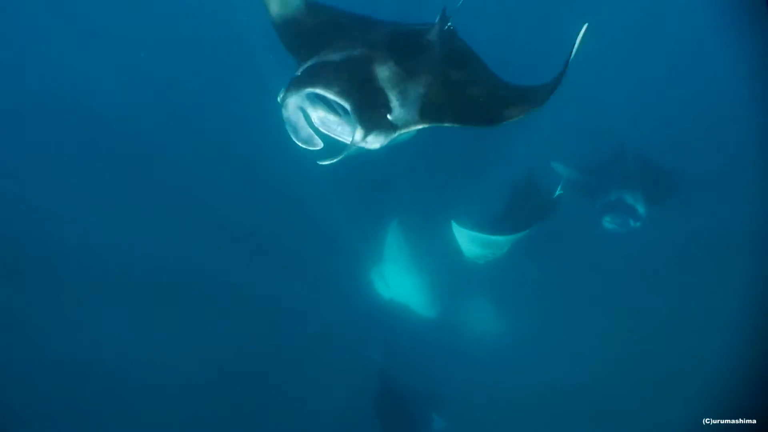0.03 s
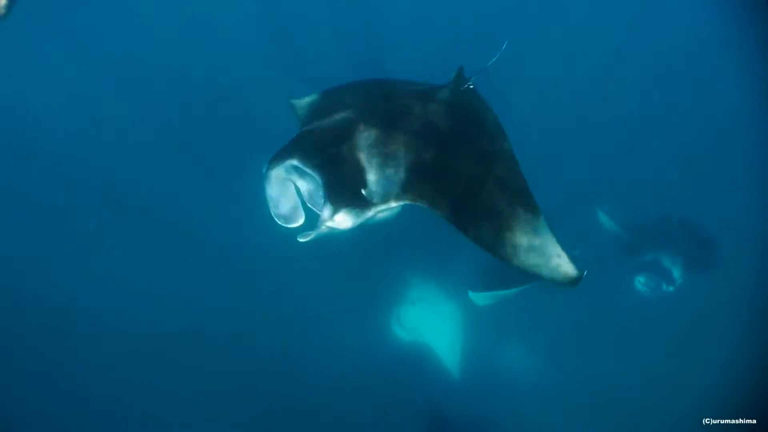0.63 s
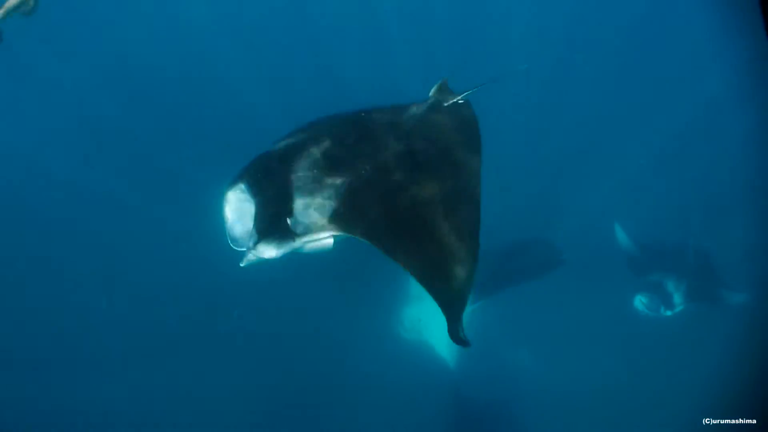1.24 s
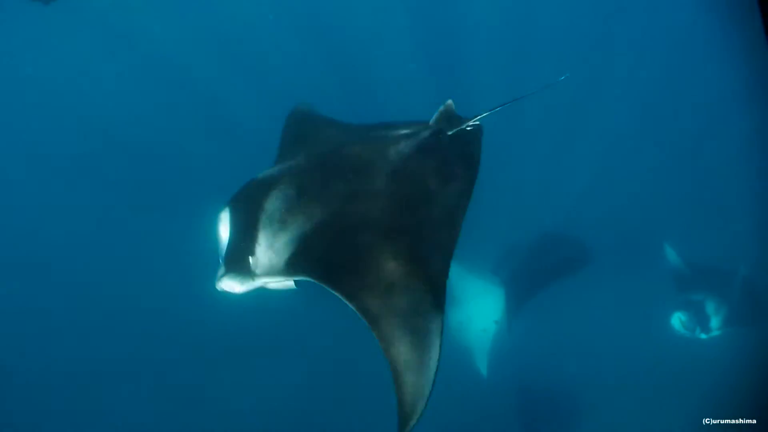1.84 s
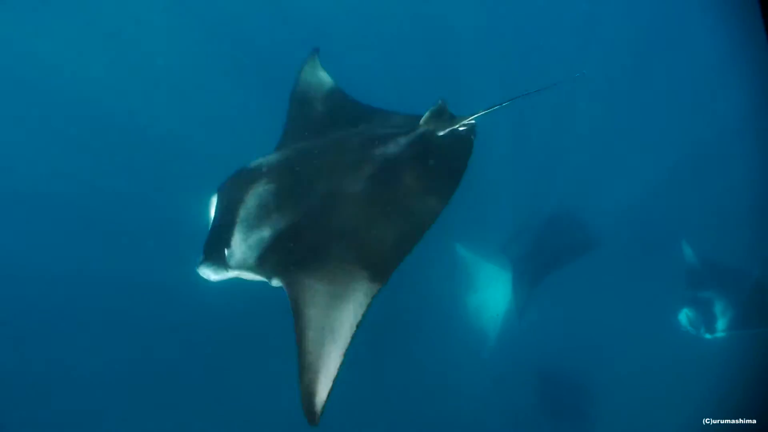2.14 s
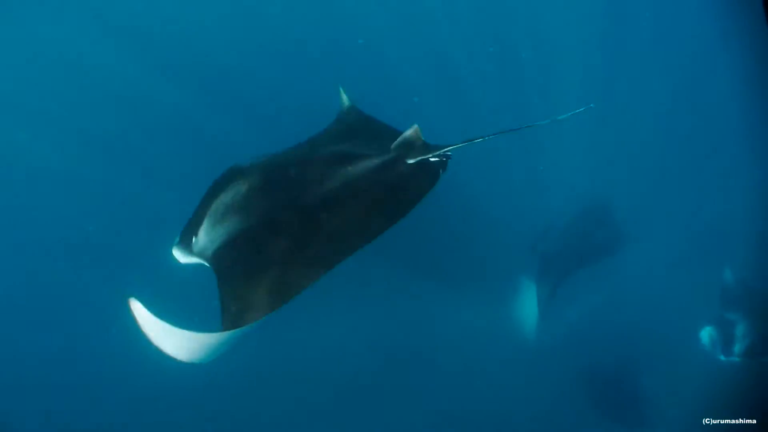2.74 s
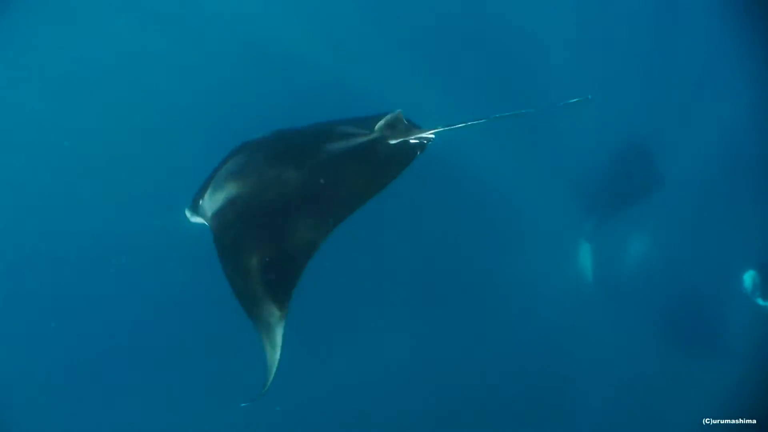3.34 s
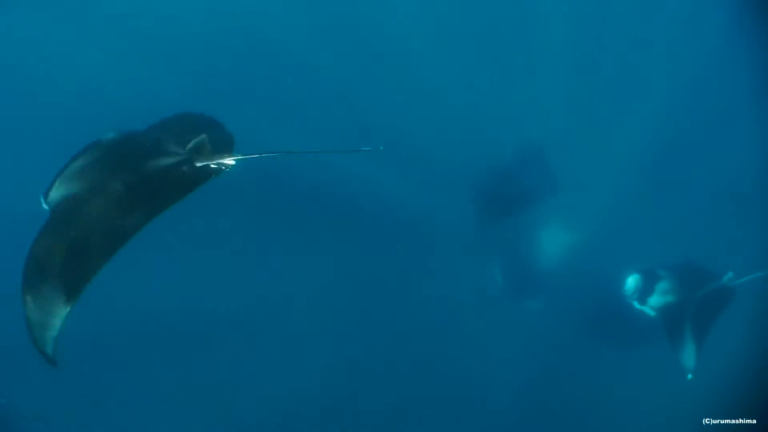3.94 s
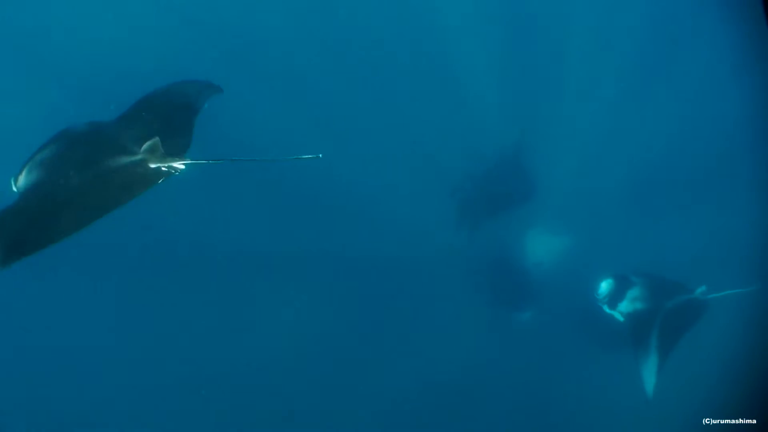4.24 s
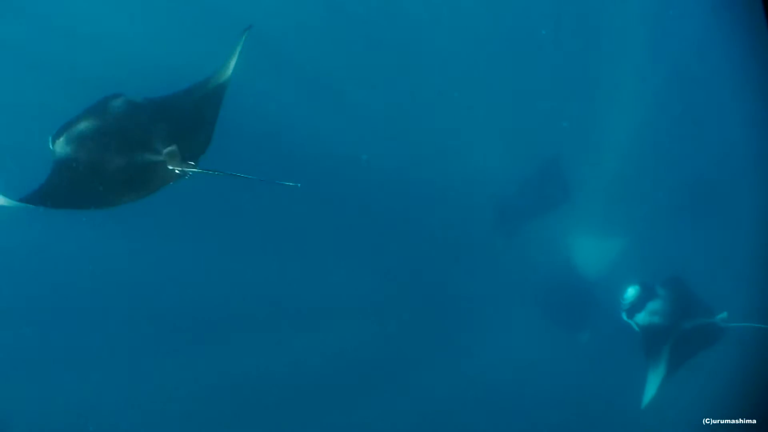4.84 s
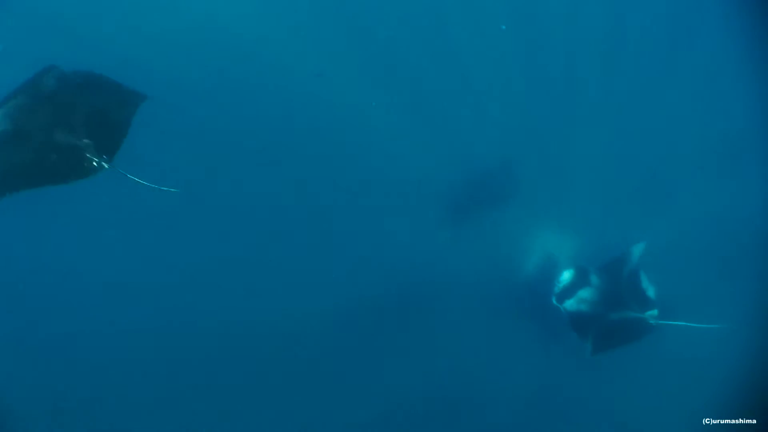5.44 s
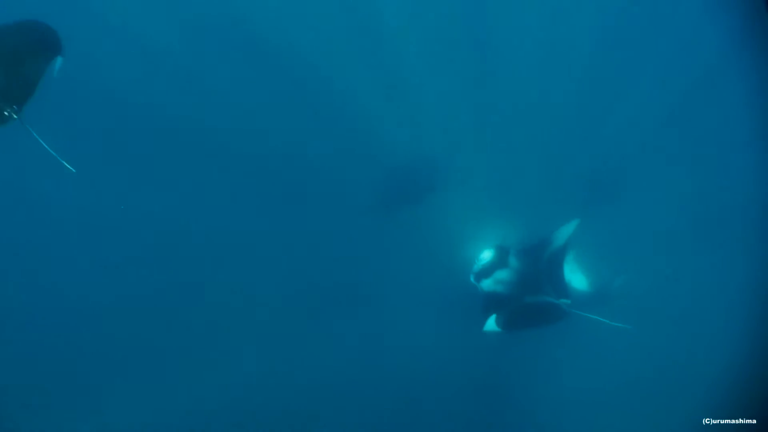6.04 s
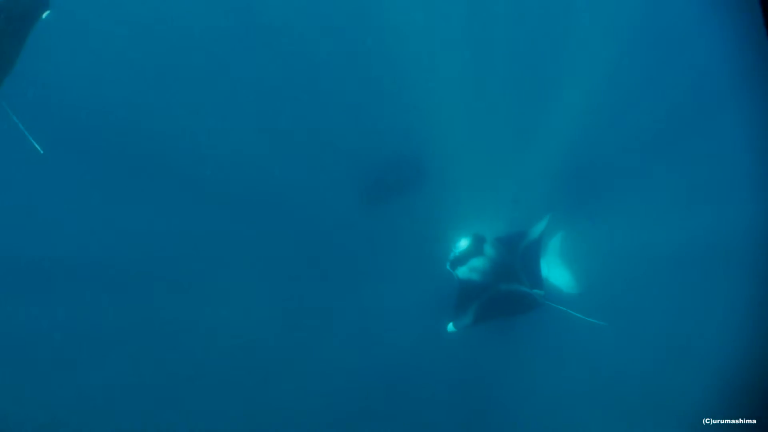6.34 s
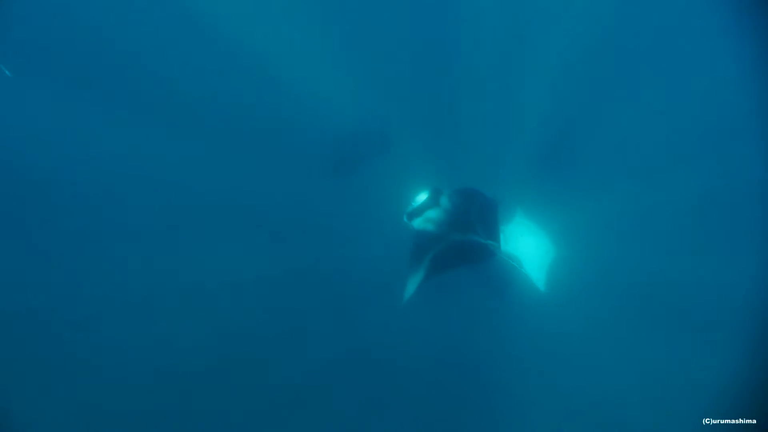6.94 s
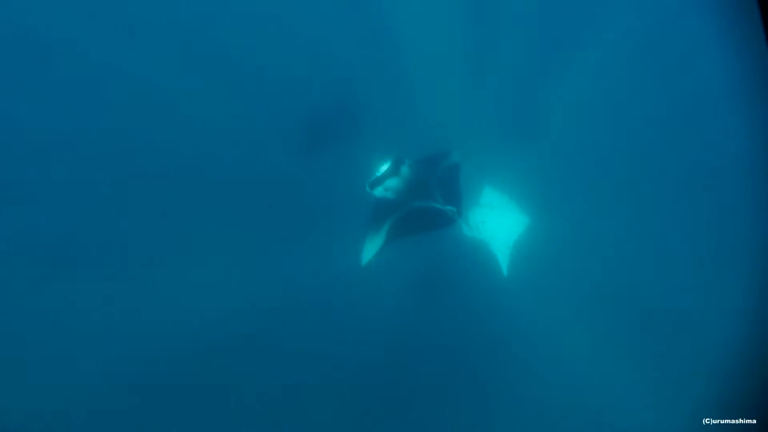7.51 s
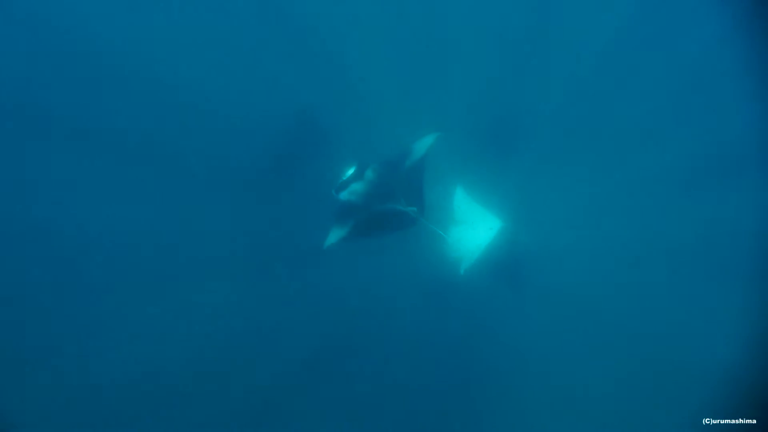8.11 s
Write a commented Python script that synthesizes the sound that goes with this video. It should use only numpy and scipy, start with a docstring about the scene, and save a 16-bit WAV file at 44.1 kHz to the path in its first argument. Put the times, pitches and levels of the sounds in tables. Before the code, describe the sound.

For about eight seconds, a microphone inside an underwater camera housing hears a quiet, dull wash of water, sprinkled with tiny snaps and pops. Very close, a small steadying motor works in short, irregular bursts throughout, making the housing hum on a few middle tones, with brief squeaks and light clacks that crowd together between 5 and 7 seconds. A focus motor adds a soft whine and rapid ticking from the start to 1.3 seconds, from 2.6 to 3.7, and from 4.5 to 6.9. Hands bump the housing with occasional soft rumbles. A rubber seal squeaks faintly near 2.7 seconds and groans briefly near 3.9. At 4 seconds comes one hard, sharp knock with a quick rebound, by far the loudest sound. Much weaker taps follow near 5.7 and 6.9. A very faint, high electronic whine persists underneath.

```python
"""A diving camera adrift

A camera in a diving housing drifts in a dull wash of water, pricked by tiny snaps. A rubber seal
creaks, hands bump the housing softly, and something knocks hard on it once. The electronics whine
faintly, and three times the focus motor runs, whining and ticking once a frame. The stabiliser
servo, a small steadying motor, works in fits and starts and makes the housing hum and clack."""
import sys
import numpy as np
from scipy import signal
from scipy.fft import rfft, irfft
from scipy.io import wavfile
from scipy.ndimage import uniform_filter1d

SR = 44100
rng = np.random.default_rng(int(sys.argv[2]) if len(sys.argv) > 2 else 0)


def store_wav(level_fs):
    """Save 16-bit WAV to argv[1]."""
    pcm = np.round(np.clip(np.atleast_2d(level_fs), -1, 1) * 32767)
    wavfile.write(sys.argv[1], SR, pcm.T.astype(np.int16))


N = 360297
T = np.arange(N) / SR
FREQS = np.arange(N // 2 + 1) * SR / N


def undb(db):
    """Turn decibels into a gain."""
    return 10 ** (np.asarray(db) / 20)


def unit(x):
    """Scale to an average strength (rms) of 1."""
    return x / np.sqrt(np.mean(x ** 2))


def even(x, size):
    """Hold a noise's strength steady over spans of `size` samples, keeping its fine grain."""
    return x / np.sqrt(uniform_filter1d(np.mean(x ** 2, axis=0), size) + 1e-9)


def over_time(rows):
    """Join (time_s, value) rows with straight lines."""
    return np.interp(T, *np.transpose(rows))


def over_pitch(rows):
    """Spread each column of a (pitch_hz, ...) table over all frequencies."""
    hz, *columns = np.transpose(rows)
    return [np.interp(np.log(FREQS + 1), np.log(hz), column) for column in columns]


def wander(rate_hz):
    """A smooth random drift, about 1 in size."""
    hold = max(int(SR / rate_hz), 1)
    steps = np.repeat(rng.standard_normal(N // hold + 1), hold)
    return unit(uniform_filter1d(steps, hold)[:N])


def sides(difference):
    """Split between left and right: pan_db makes the left louder, lead_rad makes it earlier."""
    return np.array([[.5], [-.5]]) * difference


def add(out, start_s, sound):
    """Mix a short sound in at start_s."""
    start = int(start_s * SR)
    out[:, start:start + sound.shape[-1]] += sound[..., :N - start]


# How the two microphones hear the housing: pitch_hz, likeness (0 to 1), lead_rad, pan_db
MICROPHONE_PAIR = [(60, 0.7, 0.6, 0.5), (250, 0.97, 0.54, 1), (377, 0.82, 0.92, 0.5),
                   (698, 0.92, 0.49, -0.3), (924, 0.56, 1.99, 6), (1109, 0.02, -1.7, 1.5),
                   (1113, 0.71, -0.5, 10), (1200, 0.95, -0.8, 1), (1314, 1, -1.17, -2),
                   (1665, 0.67, 3.5, 0.5), (2000, 0.83, 3.5, 1), (3040, 0.71, 2, -0.5), (5100, 0.59, 3, -1),
                   (7050, 0.38, 3, -0.3)]

def shaking(grain=1):
    """Stereo spectrum of random shaking: the walls move both sides together low down, opposed higher up."""
    likeness, lead_rad, pan_db = over_pitch(MICROPHONE_PAIR)
    shared, left, right = rfft(grain * rng.standard_normal((3, N)))
    pair = np.sqrt(likeness) * shared + np.sqrt(1 - likeness) * np.array([left, right])
    return pair * undb(sides(pan_db)) * np.exp(1j * sides(lead_rad))


def shaped_noise(spectrum, gain):
    """Colour a spectrum and turn it into sound of strength 1."""
    return unit(irfft(spectrum * gain, N))


def resonate(spectrum, modes, skirt):
    """Shaking rings a part at its own pitches (modes); a higher skirt leaves less between them."""
    power = sum(undb(db) ** 2 / (1 + (2 * (FREQS - hz) / width_hz) ** 2 / skirt) ** skirt
                for hz, width_hz, db in modes)
    return shaped_noise(spectrum, np.sqrt(power))


def squeals(rows, gain_db, pan_db, lead_rad, sag, waver_db):
    """Surfaces stick and slip: each tone starts fast, wavers, sinks a little in pitch and dies away."""
    out = np.zeros((2, N))
    waver = undb(waver_db * wander(110))
    phases = rng.uniform(0, 2 * np.pi, len(rows))
    for (start_s, db, hz, length_s), phase in zip(rows, phases):
        t = np.arange(int(length_s * SR)) / SR
        swell = np.sin(np.pi * np.sqrt(t / length_s))
        cycles = np.cumsum(hz * (1 + sag * (.5 - t / length_s))) / SR
        tone = np.sin(2 * np.pi * cycles + phase + sides(lead_rad))
        add(out, start_s, undb(db + gain_db + sides(pan_db)) * swell * tone)
    return out * waver


# The tone colour of the water: pitch_hz, relative_db
WATER_COLOUR = [(25, -50), (60, -18.5), (100, -10), (150, -4.5), (400, -1), (700, 3), (1350, -3.5),
                (1700, -1.5), (2800, -5), (3500, -9.5), (4800, -10), (6500, -14.5), (10000, -20),
                (15000, -30.5)]
# Its slow rise and fall: time_s, relative_db
WATER_SWELL = [(0, -69), (2.4, -71.5), (3.55, -70.5), (4.2, -68), (5.05, -69), (6.37, -71), (6.8, -70),
               (7.35, -71.5), (8.17, -72)]

def water_wash(gain_db=15, recording_flutter_db=1.3):
    noise = shaped_noise(shaking(), undb(over_pitch(WATER_COLOUR)[0]))
    return noise * undb(over_time(WATER_SWELL) + gain_db + recording_flutter_db * wander(25))


# The high tones of the electronics: pitch_hz, level_db, pan_db
ELECTRONICS_TONES = [(7867, -96.5, -5), (15734, -101, -3)]

def whine(tones, waver_db, waver_hz):
    """Electronics or a motor sing thin, steady tones that waver in strength."""
    out = np.zeros((2, N))
    for hz, db, pan_db in tones:
        strength = np.sqrt(2) * undb(db + sides(pan_db) + waver_db * wander(waver_hz))
        phase = 2 * np.pi * hz * T + 0.47 * wander(5.7)
        out += strength * np.sin(phase + sides(0.25))
    return out


# Nearby snaps and pops: start_s, peak_db, pitch_hz, half_width (of the band, as a log ratio)
NEAR_SNAPS = [(0.357, -44, 5500, 0.35), (0.527, -41, 5000, 0.44), (0.812, -45, 3600, .33),
              (1.333, -33.5, 2900, 0.26), (1.432, -49, 4070, 0.28), (1.645, -53, 2690, 0.07),
              (1.961, -44, 4180, 0.33), (2.541, -43, 3370, .25), (2.922, -50, 2060, 0.048),
              (3.078, -46, 2020, 0.081), (3.313, -45, 3100, 0.71), (4.027, -50, 5100, .1),
              (4.129, -50, 2380, 0.073), (4.175, -38.5, 4600, 0.11), (4.224, -45, 7650, .06),
              (4.242, -47, 3160, 0.049), (4.267, -50, 2480, .2), (4.438, -41, 3200, 0.6),
              (4.642, -42.5, 3520, 0.38), (5.449, -45, 2740, 0.21), (5.47, -39, 3300, 0.75),
              (6.334, -45, 3000, 0.49), (6.859, -37.5, 3300, 0.43), (6.972, -40, 3010, 0.29)]

def water_snaps(far_count=80, far_db=-60, spread_db=8, far_width=0.23, decay_s=0.0028):
    """Tiny cracks, as of shrimp, and narrower pops, as of bubbles: near ones over many far ones."""
    far_snaps = [(when * (N - 1) / SR, far_db + spread_db * size ** 2, 2800 + 5500 * pitch, far_width)
                 for when, size, pitch in rng.random((far_count, 3))]
    t = np.arange(SR // 40) / SR
    out = np.zeros((2, N))
    for start_s, db, hz, width in NEAR_SNAPS + far_snaps:
        band = signal.butter(2, [hz * np.exp(-width), hz * np.exp(width)], "band", fs=SR)
        crack = signal.lfilter(*band, rng.standard_normal((2, len(t))) * np.exp(-t / decay_s))
        add(out, start_s, undb(db) * crack / np.abs(crack).max())
    return out


# Creaks and low groans of the seal: start_s, relative_db, pitch_hz, length_s
SEAL_CREAKS = [(1.147, -42, 1820, 0.013), (1.898, -48.5, 1520, 0.012), (2.702, -42, 2180, 0.0069),
               (2.711, -38, 2000, 0.018), (2.732, -45, 2110, 0.01), (2.734, -43, 2670, 0.01),
               (2.742, -39, 2900, 0.014), (2.744, -46, 3300, 0.0055), (3.852, -45, 333, 0.035),
               (3.855, -36.5, 534, 0.011), (3.88, -40, 430, 0.02)]

def seal_creaks():
    """The rubber seal grips and lets go unevenly, which roughens its squeaks."""
    squeaks = squeals(SEAL_CREAKS, gain_db=-4, pan_db=1, lead_rad=1.1, sag=0.02, waver_db=-2)
    grip = .5 + .8 * wander(450)
    return squeaks * grip


# Notes of the struck housing: pitch_hz, relative_db, ring_s (time to fade 60 dB), pan_db, lead_rad
HOUSING_MODES = [(173, -26.5, 0.072, 0, 0.7), (228, -31.5, 0.059, 2, 0.6), (298, -19, 0.056, 0, 0.1),
                 (392, -23, 0.023, -6, 0.5), (506, -19, 0.029, 1, 0.9), (636, -36, 0.081, 1, 1),
                 (846, -27, 0.05, -6, 4), (1025, -27, 0.03, -14, 3.5), (1324, -14, 0.037, -3, 1),
                 (1570, -35, 0.077, -0.5, -1), (1740, -18, 0.014, 7, 4), (1936, -12, 0.019, 1, 4),
                 (2200, -19.5, 0.016, -9, 4), (2360, -21.5, 0.032, -3, 2), (2590, -23.5, 0.016, -4, 0.5),
                 (2840, -21, 0.019, -4, 1.7), (3350, -27, 0.012, -8, 2), (3760, -19.5, 0.012, 1, 1.7),
                 (4030, -23, 0.016, 6.5, 2), (4530, -20.5, 0.0081, -3, -1), (5670, -28.5, 0.0084, -1, 4)]
# Blows on the housing and their rebounds: start_s, strength_db, contact_ms
BLOWS = [(3.9845, 3, 0.029), (3.9902, -12.5, 0.02), (4.002, -6.5, 0.41), (4.0094, -9.5, 0.53),
         (4.536, -26, 0.16), (5.695, -11.5, 0.23), (6.899, -17.5, 0.18)]

def housing_knocks(wall_hz=6000, bass_hz=150, crack_db=-24, crack_s=0.0018, crack_hz=4300):
    """Blows crack and ring the water-damped housing; a longer contact leaves only the low notes."""
    t = np.arange(SR // 6) / SR
    ring = 0
    for k, (hz, db, ring_s, pan_db, lead_rad) in enumerate(HOUSING_MODES):
        travel_s = .00033 * np.sqrt(1000 / hz)  # higher bending waves get round the shell sooner
        age = np.maximum(t - travel_s, 0)
        envelope = (1 - np.exp(-2 * age * hz)) * np.exp(-np.log(1000) * age / ring_s)
        tone = np.sin(2 * np.pi * hz * age + sides(lead_rad))
        ring = ring + (-1) ** k * undb(db + sides(pan_db)) * envelope * tone
    crack = undb(crack_db) * rng.standard_normal((2, len(t))) * np.exp(-t / crack_s)
    knock = ring + signal.lfilter(*signal.butter(2, crack_hz, fs=SR), crack)
    knock = signal.lfilter(*signal.butter(4, wall_hz, fs=SR), knock)
    knock = signal.lfilter(*signal.butter(2, bass_hz, "high", fs=SR), knock)
    out = np.zeros((2, N))
    for start_s, db, contact_ms in BLOWS:
        softness = np.exp(-1000 / (contact_ms * SR))
        softened = signal.lfilter([(1 - softness) ** 2], np.poly([softness, softness]), knock)
        add(out, start_s, undb(db) * softened)
    return out


# When the focus motor runs: start_s, end_s
FOCUS_TIMES = [(-.1, 1.3), (2.565, 3.72), (4.53, 6.9)]

def focus_running():
    """1 while the focus motor runs, else 0, with short fades between."""
    running = sum(1. * ((T > start_s) & (T < end_s)) for start_s, end_s in FOCUS_TIMES)
    return uniform_filter1d(running, size=900)


# Where the gears and the ticks ring: pitch_hz, width_hz, relative_db
FOCUS_GEAR_MODES = [(256, 28, -1), (438.6, 22, 4.5), (615, 11, -1), (560, 15, -21.5), (844, 20.5, 11),
                    (929, 18, 10), (1140, 25, -26), (1660, 103, 0)]
FOCUS_TICK_MODES = [(2220, 380, -4), (2616, 130, -1), (2870, 100, -2.5), (3074, 82, -0.5),
                    (3400, 300, -19.5), (3880, 200, -5.5), (4600, 420, -29)]
# The motor's tones at once and twice its step rate: level_db, pan_db
FOCUS_HARMONICS = [(-64.5, 2), (-66, 19.5)]

def focus_motor(step_hz=479.52, frame_hz=29.97, gear_db=-56, tick_db=-55.5, uneven_db=1.6,
                hold_s=.003, release_s=.007, jitter_s=.0008):
    """The focus motor whines, its gears rustle, and it ticks as it moves on about once a frame."""
    since_tick = (T - .0101 + jitter_s * wander(frame_hz)) % (1 / frame_hz)
    spectrum = shaking()
    pulses = uniform_filter1d(np.exp(-np.maximum(since_tick - hold_s, 0) / release_s), size=90)
    tick_noise = even(resonate(spectrum, FOCUS_TICK_MODES, skirt=12), size=500)
    ticks = tick_noise * pulses * undb(tick_db + uneven_db * wander(30))
    gears = resonate(spectrum, FOCUS_GEAR_MODES, skirt=7.9) * undb(gear_db)
    tones = [(k * step_hz, db, pan_db) for k, (db, pan_db) in enumerate(FOCUS_HARMONICS, 1)]
    return focus_running() * (ticks + gears + whine(tones, waver_db=2, waver_hz=22))


# The servo's hard catches: start_s, peak_db, pitch_hz
HARD_CATCHES = [(0.164, -34, 750), (0.502, -35, 800), (0.786, -37, 900), (0.801, -34, 950),
                (0.891, -32.5, 800), (1.179, -37, 750), (1.438, -40, 550), (1.974, -35, 454),
                (2.449, -36, 650), (2.791, -36, 650), (2.843, -37, 900), (2.973, -36.5, 610),
                (3.008, -37, 650), (3.035, -36, 446), (3.078, -37, 600), (3.642, -37, 750),
                (4.208, -33.5, 597), (5.087, -36.5, 850), (5.114, -32.5, 750), (5.146, -42, 950),
                (5.206, -33.5, 1000), (5.259, -36, 750), (5.371, -33, 550), (5.408, -35, 850),
                (5.516, -33.5, 900), (5.614, -39, 700), (5.950, -34, 850), (6.097, -32, 700),
                (6.120, -36, 700), (6.176, -42, 750), (6.214, -35, 900), (6.576, -38, 800),
                (6.690, -39, 550), (6.771, -35, 700), (6.845, -40, 750), (6.912, -31, 900),
                (6.978, -41, 850), (7.603, -37, 700)]

def servo_clacks(half_width=0.54, attack_s=0.00024, decay_s=.004, wall_hz=1500):
    """Each hard catch jolts the housing over a wide band of pitches for a few milliseconds."""
    noise = shaped_noise(shaking(), 1 / np.sqrt(1 + (FREQS / wall_hz) ** 20))
    t = np.arange(SR // 40) / SR
    envelope = (1 - np.exp(-t / attack_s)) * np.exp(-t / decay_s)
    out = np.zeros((2, N))
    for start_s, db, hz in HARD_CATCHES:
        start = int(start_s * SR)
        band = signal.butter(2, [hz * np.exp(-half_width), hz * np.exp(half_width)], "band", fs=SR)
        jolt = signal.lfilter(*band, noise[:, start:start + len(t)] * envelope)
        add(out, start_s, undb(db) * jolt / np.abs(jolt).max())
    return out


# The servo's jerks: start_s, relative_db, pitch_hz, length_s
SERVO_JERKS = [(0.16, -32.5, 685, 0.03), (0.225, -35, 703, 0.019), (0.56, -28.5, 690, 0.024),
               (0.723, -34.5, 1164, 0.02), (0.757, -31.5, 700, 0.017), (1.02, -31.5, 683, 0.037),
               (1.179, -34, 703, 0.055), (1.278, -35.5, 696, 0.054), (1.725, -36, 680, 0.027),
               (1.785, -35, 1176, 0.014), (1.94, -33.5, 690, 0.031), (1.975, -26, 682, 0.025),
               (2.245, -40, 1164, 0.016), (2.67, -31, 667, 0.031), (2.975, -35, 698, 0.022),
               (3.365, -36, 680, 0.033), (3.642, -35.5, 826, 0.014), (3.705, -34.5, 1105, 0.032),
               (3.778, -32, 1116, 0.011), (4.122, -31.5, 1142, 0.017), (4.131, -34, 683, 0.074),
               (4.368, -36, 702, 0.017), (4.373, -41, 1223, 0.02), (4.508, -35, 1095, 0.022),
               (4.54, -30, 640, 0.0047), (4.757, -37, 710, 0.024), (4.889, -32.5, 700, 0.019),
               (4.94, -34, 693, 0.022), (4.972, -33, 674, 0.02), (5.145, -35, 1100, 0.0085),
               (5.424, -37, 664, 0.018), (5.516, -30.5, 675, 0.018), (5.578, -37, 650, 0.026),
               (5.909, -33, 703, 0.021), (5.932, -32, 1110, 0.03), (6.115, -38, 690, 0.06),
               (6.93, -40, 707, 0.054), (7.036, -38, 1200, 0.015), (7.06, -45, 703, 0.053),
               (7.118, -31.5, 1130, 0.013), (7.14, -36, 1166, 0.053), (7.135, -38, 686, 0.091),
               (7.19, -43, 690, 0.06), (7.235, -37.5, 1138, 0.025), (7.24, -39.5, 704, 0.13),
               (7.41, -42, 619.6, 0.04), (7.438, -36, 600, 0.026), (7.701, -31, 674, 0.038),
               (7.756, -32, 682, 0.034), (7.785, -43, 692, 0.035), (7.851, -34, 1160, 0.0091),
               (7.907, -33, 700, 0.038), (7.938, -42, 672, 0.055)]

def servo_jerks():
    """The servo jerks, and one note of the housing sings out."""
    return squeals(SERVO_JERKS, gain_db=-6.5, pan_db=0.5, lead_rad=0.51, sag=0.027, waver_db=2)


def servo_slips(drive_db, count=170, spread_db=2, low_hz=685, high_hz=1170, length_s=0.0096):
    """Many small slips, each ringing near one of two main notes, louder when the servo works hard."""
    when, size, which, detune = rng.random((count, 4)).T
    starts = (when * (N - 1)).astype(int)
    hz = np.where(which < .5, low_hz, high_hz) * (1 + 0.24 * (detune - .5))
    db = drive_db[starts] - spread_db * (2 * size - 1)  # longer slips are quieter
    rows = np.column_stack([starts / SR, db, hz, length_s * (.5 + size)])
    return squeals(rows, gain_db=3, pan_db=7, lead_rad=0.42, sag=0.038, waver_db=-2)


def servo_grain(catches_per_s=70, spread_db=1.5, ring_s=0.0035, smooth_db=-3):
    """The servo's roughness, as a gain: tiny catches jump up and fade fast over smooth running."""
    is_catch = rng.random(N) < catches_per_s / SR
    catch_power = is_catch * undb(spread_db * rng.uniform(-0.85, 1.1, N)) ** 2
    power = signal.lfilter([1], [1, -np.exp(-1 / (ring_s * SR))], catch_power)
    return np.sqrt(power / power.mean() + undb(smooth_db) ** 2)


# The servo's moves: start_s, length_s, drive_db, buzz_offset_db (high buzz compared with the drive)
SERVO_MOVES = [(0, 0.11, -50.5, -1), (0.162, 0.1, -54, 3.5), (0.34, 0.04, -56.5, 5),
               (0.475, 0.042, -50, -1.5), (0.54, 0.13, -55.5, 0), (0.722, 0.15, -50, 0),
               (0.972, 0.1, -54.5, 1.5), (1.169, 0.096, -48, -2), (1.415, 0.1, -48, -4.5),
               (1.543, 0.055, -47.5, -6.5), (1.73, 0.012, -54, -17), (1.762, 0.092, -48, -6.5),
               (1.931, 0.075, -51, -1), (2.05, 0.068, -48, -9), (2.133, 0.061, -53.5, -23),
               (2.298, 0.17, -46, -5), (2.621, 0.083, -48.5, -4.5), (2.72, 0.13, -50, -3),
               (2.96, 0.081, -48, -6.5), (3.048, 0.19, -54, -10), (3.174, 0.17, -56.5, -2),
               (3.35, 0.074, -49.5, -4), (3.627, 0.13, -50.5, 0), (4.015, 0.068, -51, -3),
               (4.113, 0.13, -48.5, -1.5), (4.308, 0.074, -50, -2), (4.447, 0.11, -51, -1),
               (4.59, 0.082, -49.5, -2), (4.724, 0.11, -50, -4), (4.858, 0.2, -51, -4.5),
               (5.073, 0.18, -54.5, -0.5), (5.253, 0.041, -47, -3), (5.334, 0.117, -47, -5),
               (5.454, 0.19, -52, -2.5), (5.792, 0.19, -51.5, -1), (6.024, 0.18, -48.5, -1),
               (6.25, 0.24, -51, -2), (6.565, 0.089, -54.5, -2), (6.684, 0.029, -51.5, 2),
               (6.766, 0.093, -48, -21), (6.884, 0.11, -52.5, 0.5), (7.008, 0.075, -63, 0),
               (7.084, 0.11, -51, 3.5), (7.212, 0.16, -50.5, 1.5), (7.376, 0.076, -50, -14),
               (7.599, 0.092, -49.5, -8), (7.685, 0.11, -47, -1.5), (7.846, 0.11, -51, 1),
               (8.143, 0.015, -49, 3)]

def servo_effort(attack_s=0.0077, release_s=0.0065, idle_db=-64.5, focus_load_db=6, idle_buzz_db=0.5,
                 hunt_db=3.5, hunt_hz=28):
    """Drive and buzz levels in dB: each move spins up, holds and runs down over a restless idle."""
    # The servo idles harder while it bears the focus motor.
    idle = undb(idle_db + focus_load_db * focus_running() + hunt_db * wander(hunt_hz))
    moving = np.zeros((2, N))
    for start_s, length_s, db, buzz_offset_db in SERVO_MOVES:
        t = np.arange(int((length_s + 10 * release_s) * SR)) / SR
        envelope = (1 - np.exp(-t / attack_s)) * np.exp(-np.maximum(t - length_s, 0) / release_s)
        add(moving, start_s, undb([[db], [db + buzz_offset_db]]) * envelope)
    return 20 * np.log10(np.hypot(moving, idle * undb([[0], [idle_buzz_db]])))


# Where the shaken housing rings, low, middle and high: pitch_hz, width_hz, relative_db
LOW_MODES = [(151, 28, -12.5), (225.7, 14.7, -1), (254, 15, 2), (334, 103, -8.5), (440, 41, -4.5),
             (510, 200, -6)]
MIDDLE_MODES = [(612, 56, 4), (680.7, 48, 12), (818, 107, 3.5)]
HIGH_MODES = [(1164, 194, -1), (1190, 89, -15), (1346, 158, -8), (1680, 80, -20), (1913, 53, -15),
              (2300, 110, -19), (2680, 110, -30), (3078, 75, -15.5), (4360, 570, -30.5)]
# The rumble of hands shifting on the housing: time_s, relative_db
HAND_RUMBLE = [(0, -58), (1.2, -58), (1.6, -72), (2.6, -67), (2.69, -51), (2.8, -79), (3.2, -102),
               (3.72, -48.5), (4.2, -77), (4.43, -80), (4.5, -50), (5.1, -67), (5.42, -50), (6.7, -58),
               (7.1, -66), (7.55, -78), (7.73, -53), (7.85, -78), (8.17, -87)]

def servo_and_hands(hum_gain_db=-2, rumble_gain_db=-8.5, focus_rumble_db=-60, hand_gain_db=-1):
    """The servo catches, slips and rings the housing; the focus motor and hands add to its rumble."""
    drive_db, buzz_db = servo_effort()
    spectrum = shaking(servo_grain())
    hum = even(resonate(spectrum, MIDDLE_MODES, skirt=4.3), size=2000) * undb(drive_db + hum_gain_db)
    buzz = even(resonate(spectrum, HIGH_MODES, skirt=2.2), size=2000) * undb(buzz_db)
    servo_power = undb(drive_db + rumble_gain_db) ** 2
    focus_power = focus_running() * undb(focus_rumble_db) ** 2
    hand_power = undb(over_time(HAND_RUMBLE) + hand_gain_db) ** 2
    rumble_level = np.sqrt(servo_power + focus_power + hand_power)
    rumble = even(resonate(spectrum, LOW_MODES, skirt=5.7), size=2000) * rumble_level
    return hum + buzz + rumble + servo_slips(drive_db)


def scene():
    """Everything heard inside the housing."""
    jerks = servo_jerks()
    creaks = seal_creaks()
    machinery = servo_and_hands() + jerks + servo_clacks() + focus_motor()
    electronics = whine(ELECTRONICS_TONES, waver_db=6, waver_hz=7.3)
    return machinery + electronics + creaks + water_wash() + housing_knocks() + water_snaps()


def record(dry, ceiling=.95, top_hz=15760):
    """The camera rounds off the loudest peak and cuts the highest treble."""
    rounded = dry / (1 + (dry / ceiling) ** 4) ** .25
    treble_cut = signal.ellip(10, .1, 80, top_hz, fs=SR, output="sos")
    return signal.sosfilt(treble_cut, rounded)


dry = scene()
out = record(dry)
store_wav(out)
```